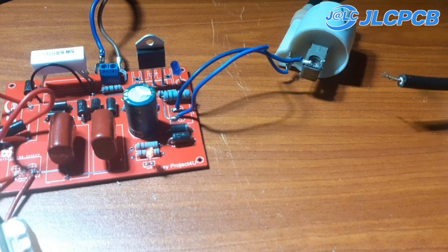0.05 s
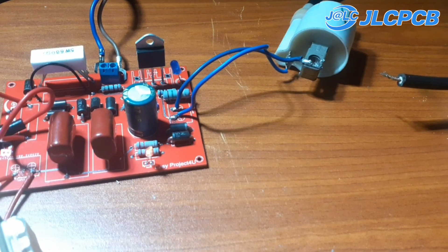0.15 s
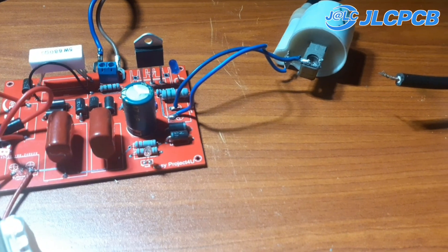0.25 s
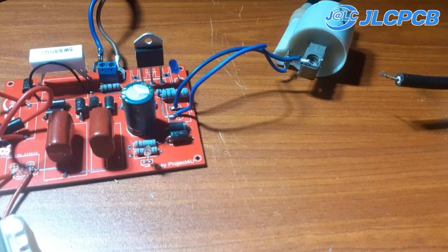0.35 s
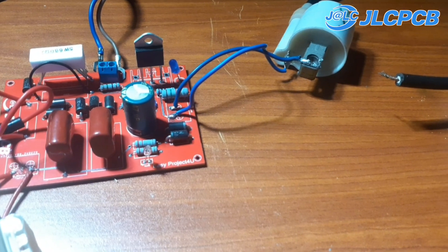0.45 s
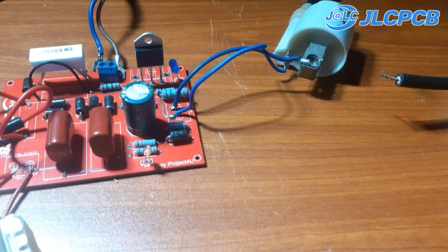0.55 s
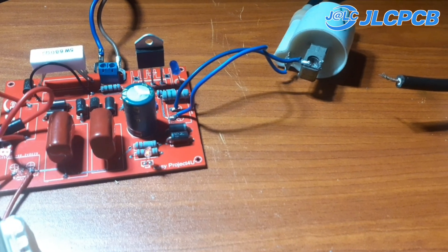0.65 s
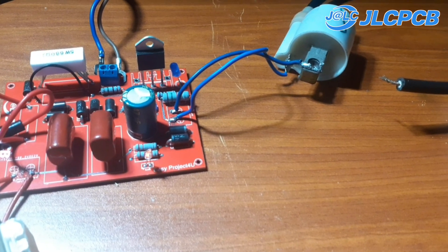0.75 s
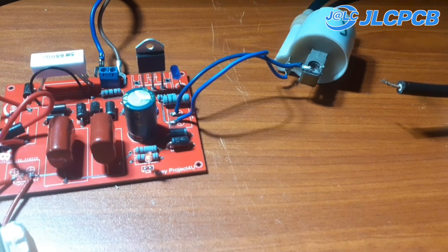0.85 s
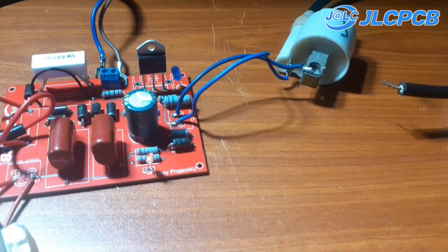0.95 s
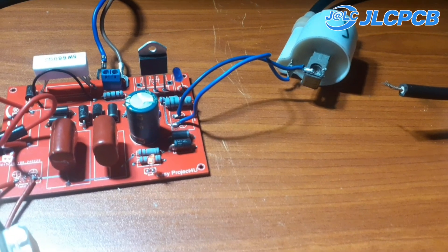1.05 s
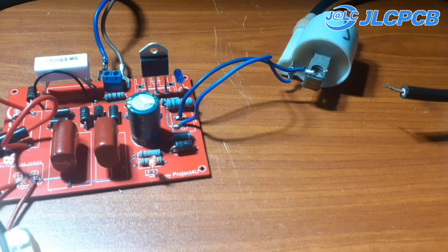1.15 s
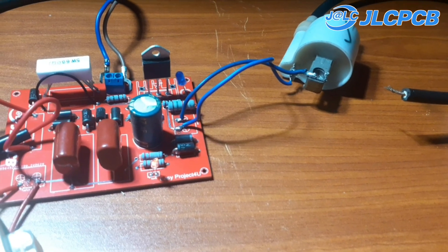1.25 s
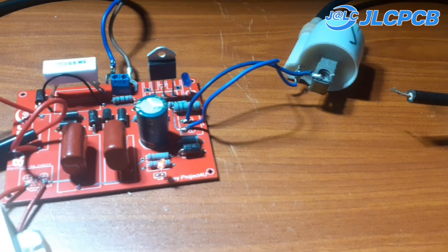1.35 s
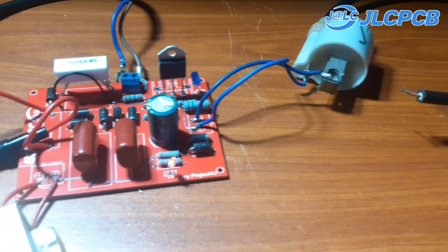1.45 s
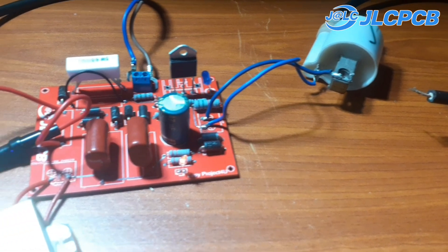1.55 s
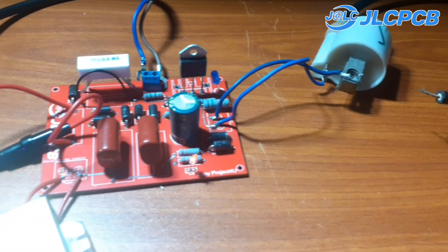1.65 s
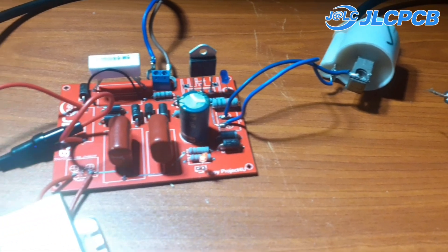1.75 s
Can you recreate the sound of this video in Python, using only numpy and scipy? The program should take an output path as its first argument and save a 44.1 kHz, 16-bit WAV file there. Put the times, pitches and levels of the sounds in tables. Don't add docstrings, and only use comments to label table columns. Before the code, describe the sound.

One loud, sharp electric spark snaps near the start, distorting the close hand-held phone microphones and ringing briefly off small room walls; before and after it, a faint fast buzzing tick, distant fan hum and hiss.

```python
import sys
import numpy as np
from scipy import signal
from scipy.fft import rfft, irfft, next_fast_len
from scipy.io import wavfile
from scipy.ndimage import uniform_filter1d, map_coordinates

SR = 44100
rng = np.random.default_rng(int(sys.argv[2]) if len(sys.argv) > 2 else 0)


def amplitude_ratio(level_db):
    exponent = np.asarray(level_db, float) / 20
    return 10 ** exponent


def master_out(mix):
    frames = np.transpose(np.atleast_2d(mix))
    ceiling = np.clip(frames, -1, 1)
    pcm = np.round(ceiling * 32767).astype(np.int16)
    wavfile.write(sys.argv[1], SR, pcm)


N = 79380
SPARK_S = 0.2407


def unit(x):
    return x / np.sqrt(np.mean(x ** 2) + 1e-20)


def along(points, hz):
    f, v = np.transpose(points)
    return np.interp(np.log(hz + 1), np.log(f + 1), v)


def sides(rows):
    rows = np.array(rows)
    return lambda hz: amplitude_ratio([along(rows[:, [0, 1]], hz), along(rows[:, [0, 2]], hz)])


def curves(rows):
    s, *cols = np.transpose(rows)
    return [np.interp(np.arange(N) / SR, s, c) for c in cols]


def wobble(rate):
    knots = rng.standard_normal(int(N * rate / SR) + 4)
    return map_coordinates(knots, [np.arange(N) * rate / SR])


def filtered(x, response):
    m = next_fast_len(N + SR // 2)
    return irfft(rfft(x, m) * response(np.fft.rfftfreq(m, 1 / SR)), m)[..., :N]


def delay(f, seconds):
    return np.exp(-2j * np.pi * f * seconds)


def resonances(rows, order=1):
    def response(f):
        total = 0
        for k, (centre, width, left_db, right_db) in enumerate(rows):
            damping = 1j * f * width * order ** 0.53
            mode = damping / (centre * centre - f * f + damping)
            total = total + (-1) ** k * amplitude_ratio([[left_db], [right_db]]) * mode ** order
        return total
    return response


def rush(spectrum, alike):
    def mid_side(hz):
        turn = np.arccos(np.clip(along(alike, hz), -1, 1)) / 2
        return amplitude_ratio(along(spectrum, hz)) * [np.cos(turn), np.sin(turn)]
    mid, side = filtered(rng.standard_normal((2, N)), mid_side)
    return unit(np.array([mid + side, mid - side]))


def tail(stretch):
    # frequency in Hz, decay time t60 in s.
    room_decay = [(100, 0.36), (500, 0.33), (2000, 0.37), (5000, 0.38), (9000, 0.31), (15000, 0.21)]
    hz, t, z = signal.stft(rng.standard_normal((2, SR)), SR, nperseg=256)
    t60 = stretch * along(room_decay, hz)[:, None]
    h = signal.istft(z * amplitude_ratio(-60 * t / t60), SR, nperseg=256)[1]
    h = h * np.clip(np.arange(h.shape[1]) / SR / 0.0011, 0, 1)
    return h / np.linalg.norm(h[0])


def hiss():
    # frequency in Hz, left in dB, right in dB.
    hiss_colour = [(1100, -11, -10), (2900, -1, 0), (4500, -15, -22), (5300, -20, -18), (6600, -1, 2),
                   (7500, -14, -11), (11000, -12, -20), (15500, -8, -11)]
    z = signal.stft(rng.standard_normal((2, N)), nperseg=512)[2]
    patches = uniform_filter1d(rng.standard_normal(z.shape[1:]), size=8, axis=0)
    patches = unit(uniform_filter1d(patches, size=10, axis=1))
    noise = signal.istft(z * amplitude_ratio(0.89 * patches), nperseg=512)[1][:, :N]
    return amplitude_ratio(-75.5) * unit(filtered(noise, sides(hiss_colour)))


def fan():
    # time in s, hum level in dB.
    beat_swell = [(0, -59.5), (.17, -65), (.3, -64), (.57, -59), (.68, -67), (.78, -76.5), (.9, -66),
                  (1.02, -60.5), (1.2, -66), (1.33, -71.5), (1.46, -60.5), (1.72, -60.5), (1.8, -67)]
    # frequency in Hz, level in dB, beat lag in s.
    hum_lines = [(49, 0, 0), (101.8, -9.5, 0.074), (158.4, -15.5, -.1), (201, -14, 0.042),
                 (241, -18.5, 0.091), (322, -20.5, .04), (490, -20.5, 0.14)]
    # frequency in Hz, spectral density in dB per Hz.
    air_colour = [(30, -27), (60, -3.5), (150, -11.5), (480, -18), (800, -33), (1200, -30.5), (1750, -12.5),
                  (2600, -25.5)]
    # frequency in Hz, left-right likeness from -1 to 1.
    air_likeness = [(60, 0.08), (300, 0.39), (700, 0.34), (1400, -0.6)]
    air_db, air_follows = -69, 0.37
    t = np.arange(N) / SR

    def swell_db(lag):
        return np.interp(t - lag, *np.transpose(beat_swell))

    hum = 0
    for hz, db, lag in hum_lines:
        line_db = db + swell_db(lag) + 1.5 * wobble(4)
        hum = hum + amplitude_ratio(line_db) * np.sin(2 * np.pi * hz * t + 0.4 * wobble(3))
    air_level_db = air_db + wobble(10) + air_follows * (swell_db(0) + 67.5)
    air = amplitude_ratio(air_level_db) * rush(air_colour, air_likeness)
    return hum * amplitude_ratio([[-0.7], [0.7]]) + air


def charger():
    # time in s, ticks per second.
    tick_pace = [
        (0, 161.5),
        (.24, 161.6),
        (.26, 159.1),
        (.55, 159.62),
        (.95, 160.0),
        (1.25, 160.62),
        (1.55, 161.06),
        (1.8, 161.3),
    ]
    # time in s, left in dB, right in dB, facing from 0 to 1.
    tick_level = [
        (0, -57, -65.5, 1),
        (.23, -57.5, -64.5, 1),
        (.5, -60.5, -68.5, 0.6),
        (.78, -61.5, -68, 0.05),
        (1.0, -60, -68, 0),
        (1.24, -59.5, -66.5, 0.03),
        (1.28, -57.5, -63, 1),
        (1.5, -56.5, -63.5, 1),
        (1.8, -56.5, -64, 1),
    ]
    # frequency in Hz, width in Hz, left in dB, right in dB,
    # loss in dB when turned away.
    board_modes = [(1539, 170, -15.5, -6.5, -2.5), (2050, 300, -12, -3, -3), (2477, 147, -8, 1.5, -1),
                   (3312, 646, 2, -1, 0), (3888, 760, -4, -11.5, 5), (4323, 250, -4, -29.5, 34),
                   (6410, 290, -16, -11, -4), (7860, 1200, -26.5, -21, -8), (8520, 510, -50, -21.5, 7),
                   (10200, 700, -15, -27, -5), (12180, 320, -7, -42, 3), (13340, 430, -34, -16.5, 9),
                   (14040, 390, -8.5, -46, 0.5), (15400, 260, -17, -2, -1)]
    start_turn, scatter_db, right_lag_s, room_db = 0.24, 0.15, 0.00041, -7
    turns = start_turn + np.cumsum(curves(tick_pace)[0]) / SR
    at = np.interp(np.arange(1, int(turns[-1]) + 1), turns, np.arange(N) / SR) * SR
    size = amplitude_ratio(scatter_db * rng.standard_normal(len(at)))

    near = np.floor(at)[:, None] + np.arange(-7, 9)
    d = near - at[:, None]
    shape = size[:, None] * np.sinc(d) * np.cos(np.pi * d / 16) ** 2
    pulses = np.bincount(np.clip(near, 0, N - 1).astype(int).ravel(), shape.ravel(), N)

    def heard(modes):
        ring = resonances(modes, order=2)
        lag = np.array([[0], [right_lag_s]])
        return filtered(-pulses, lambda f: ring(f) * (1j * f / (1000 + 1j * f)) ** 2 * delay(f, lag))

    left_db, right_db, facing = curves(tick_level)
    front = heard([row[:4] for row in board_modes])
    away = heard([(c, w, l - loss, r - loss) for c, w, l, r, loss in board_modes])
    direct = (away + np.clip(facing, 0, 1) * (front - away)) / front.std(axis=1, keepdims=True)
    wet = signal.fftconvolve(direct, tail(0.1), axes=1)[:, :N]
    return amplitude_ratio([left_db, right_db]) * direct + amplitude_ratio(room_db + right_db) * wet


def overload():
    kick_db, right_db, rise_s, decay_s = -0.5, -5.5, 0.00034, 0.00078
    cut_hz, cut_q = 54, 1.57
    t = np.arange(N) / SR - SPARK_S
    push = (t > 0) * np.exp(-np.abs(t) / decay_s) * (1 - np.exp(-np.abs(t) / rise_s))

    def low_cut(f):
        return (-f * f / (cut_hz ** 2 - f * f + 1j * f * cut_hz / cut_q)) ** 2

    return amplitude_ratio(kick_db) * filtered(push, low_cut) * np.array([[-1], [amplitude_ratio(right_db)]])


def spark():
    # frequency in Hz, width in Hz, left in dB, right in dB.
    port_modes = [(1500, 1200, -25.5, -10), (2910, 1180, 8, -7), (4460, 2000, -15, -5.5),
                  (8200, 1200, -23.5, -1), (11180, 2200, 3, -8), (14800, 2400, -3.5, -7.5)]
    # delay in s, left in dB, right in dB.
    reflections = [(.0004, -15, -11.5), (.0007, -23, -7), (.0011, -18.5, -9.5), (.0022, -12, -34),
                   (.0047, -17, -27), (.0057, -38, -18), (.0063, -27.5, -25.5), (.0121, -40.5, -2),
                   (.0175, -18, -28.5)]
    # frequency in Hz, left in dB, right in dB.
    room_colour = [(180, -14, -12.5), (477, -10.5, -9), (1000, -4.5, -4.5), (2600, -1.5, 2),
                   (4800, -3.5, -3), (8400, -5, 0.5), (9300, -9, -7.5), (15500, -1.5, -1)]
    spark_db, rise_s, right_gain_db = -1, 0.00006, 9.5
    room_db, late_db, late_t60 = -13, -41.5, 1
    u = np.clip(np.arange(N) / SR - SPARK_S, 0, None) / rise_s
    pulse = (u > 0) * (1 - u) * np.exp(-u)

    def echoes(f):
        total = amplitude_ratio([[0], [right_gain_db]])
        for k, (s, left_db, right_db) in enumerate(reflections):
            total = total + (-1) ** (k + 1) * amplitude_ratio([[left_db], [right_db]]) * delay(f, s)
        return total

    snap = filtered(pulse, resonances(port_modes))
    near = filtered(snap / np.abs(snap[0]).max(), echoes)

    flutter_db = 2.9 * np.array([wobble(350), wobble(350)])[:, :SR]
    answer = amplitude_ratio(room_db + flutter_db) * tail(1)[:, :SR]
    answer = answer + amplitude_ratio(late_db) * tail(late_t60 / 0.28)[:, :SR]
    answer = np.pad(answer, ((0, 0), (round(SPARK_S * SR), N)))[:, :N]
    toned = filtered(answer, lambda f: sides(room_colour)(f) * (f > 120))
    return amplitude_ratio(spark_db) * (near + toned * 20)


def scene():
    quiet = filtered(hiss() + fan() + charger(), lambda hz: hz < 15800)
    return quiet + overload() + spark()


def low_pass(x):
    return signal.sosfilt(signal.butter(12, 17140, fs=SR, output="sos"), x)


def record(dry):
    x = filtered(dry, lambda hz: 1 / (1 + (hz / 16250) ** 200))
    return low_pass(np.clip(x, -1, 1))


dry = scene()
out = record(dry)
master_out(out)
```